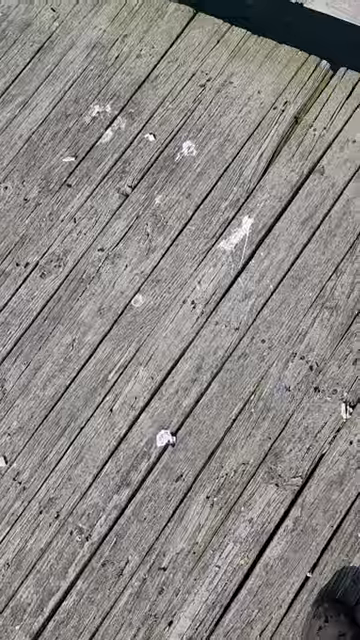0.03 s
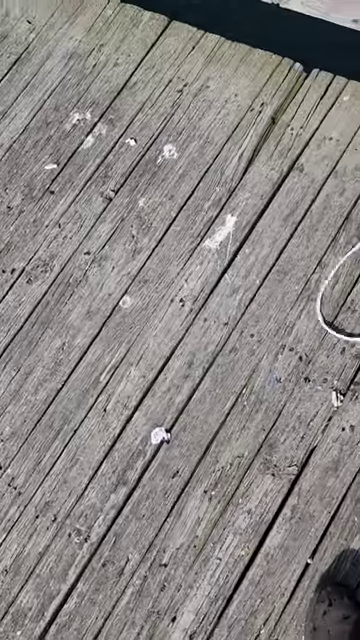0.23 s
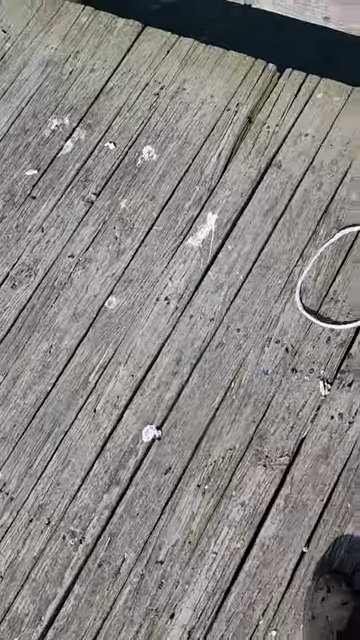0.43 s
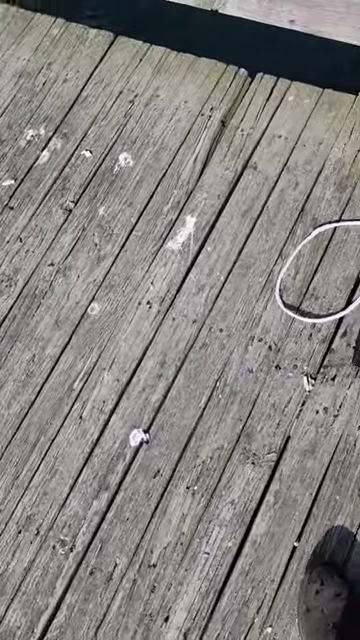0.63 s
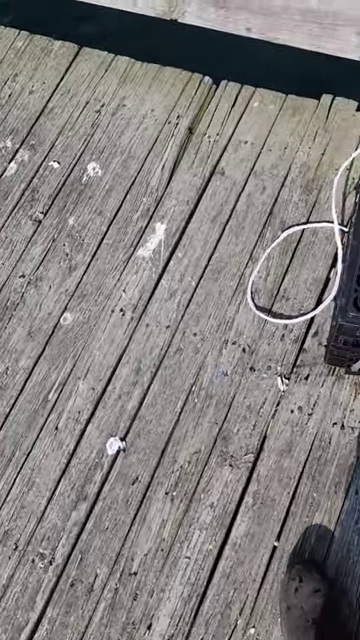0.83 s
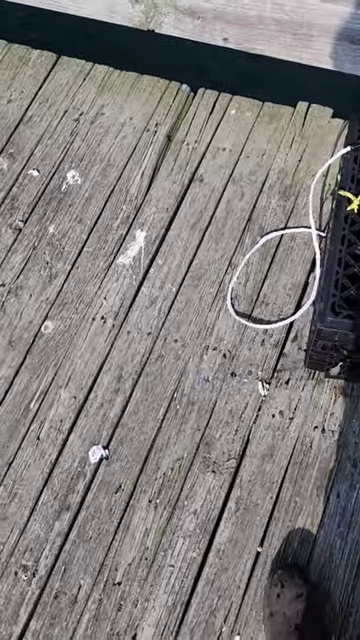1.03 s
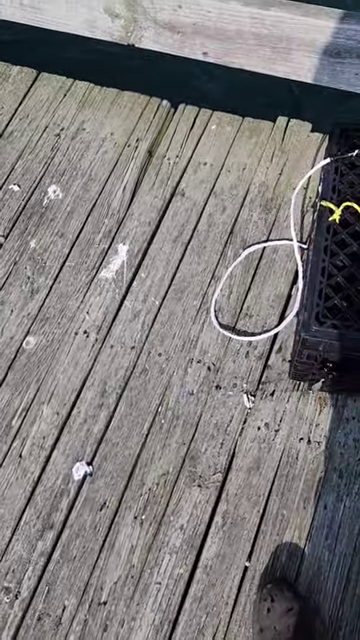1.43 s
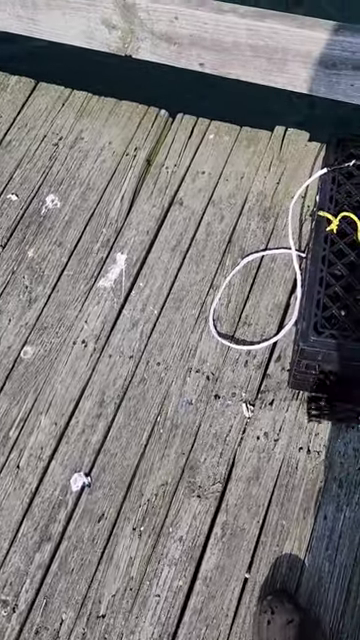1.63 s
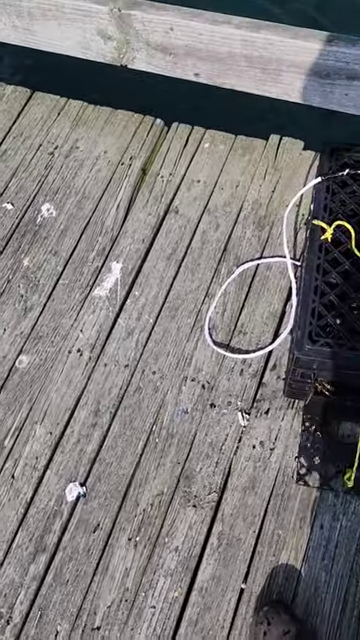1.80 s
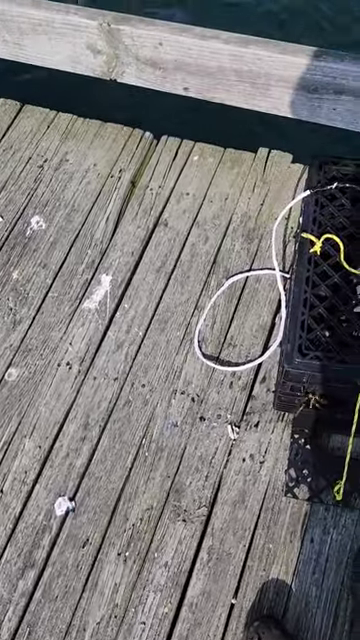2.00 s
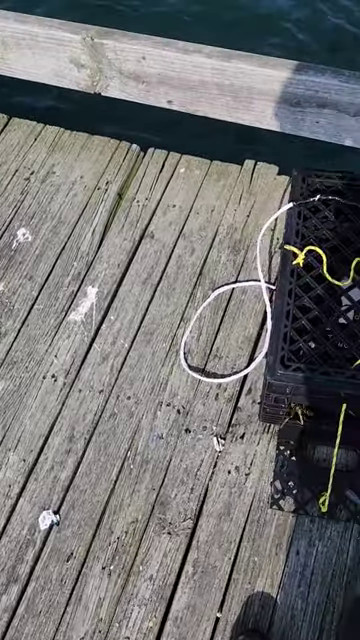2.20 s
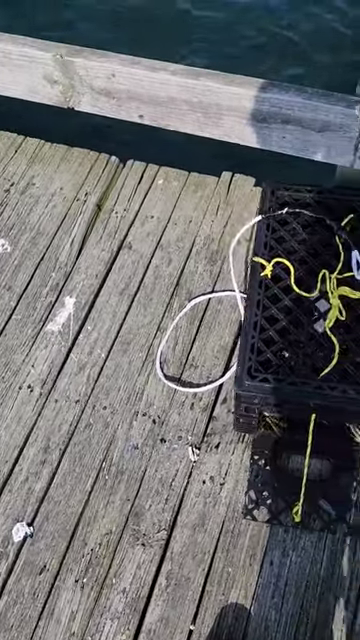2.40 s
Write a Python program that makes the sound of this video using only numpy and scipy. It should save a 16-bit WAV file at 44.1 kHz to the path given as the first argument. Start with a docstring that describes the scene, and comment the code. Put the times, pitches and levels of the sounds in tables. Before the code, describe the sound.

Sharp handling clatter on the microphone, then soft footsteps on planks over low wind.

```python
"""Low wind rumble and a faint wash of water lie under a wooden dock, where someone shifts a hand-held
camera. Fingers rub its case; it clatters sharply, then ticks, each impact ringing its damped modes.
Handling and grit underfoot make faint clicks, and shoes scuff, bump and tap on the planks.
Late on, one hard tap is followed by a gritty slide; fainter scuffs and rubbing close the scene."""
import sys
import numpy as np
from scipy.fft import rfft, irfft, next_fast_len
from scipy.io import wavfile
from scipy.ndimage import map_coordinates

SR = 44100
rng = np.random.default_rng(int(sys.argv[2]) if len(sys.argv) > 2 else 0)


def bounce(signal):
    """Save signal as a 16-bit WAV file at the path given by the first command-line argument."""
    frames = np.transpose(np.atleast_2d(signal))
    limited = np.clip(frames, -1, 1)
    pcm = np.round(limited * 32767).astype(np.int16)
    wavfile.write(sys.argv[1], SR, pcm)


N = 112454
T = np.arange(N) / SR
HIT_T = T[:SR // 3]  # time axis of one short event

# Spectra of the noises: frequency_hz, level_db
WIND_SPECTRUM = [(20, -9), (36, -5.5), (56, 0), (86, 1), (96, 2), (108, -3.5), (165, -13), (215, -13),
                 (270, -19.5), (450, -28.5), (900, -63)]
WATER_SPECTRUM = [(200, -14.5), (500, 1.5), (1000, -6.5), (2000, -14.5), (4500, -20.5), (7500, -21),
                  (9500, -34), (15500, -41)]
RUB_SPECTRUM = [(200, -2.5), (700, -4), (1550, -5), (4000, -18.5), (7500, -16), (9500, -26), (14000, -25)]
CRACK_SPECTRUM = [(150, -2), (600, -7), (1100, 6), (2100, 4), (3300, 0.5), (5000, 0), (9000, -13),
                  (16000, -27)]
TICK_SPECTRUM = [(1000, -43), (3500, -18), (6000, -6), (7000, 4.5), (8300, -7.5), (10000, -12), (11700, 2),
                 (13000, -1.5), (14500, 3.5), (16000, -4.5)]
CLICK_SPECTRUM = [(500, -1), (3000, -1), (4100, 7), (5200, 0), (7200, 3), (9500, -7), (12000, -3.5),
                  (15500, -14)]
SCUFF_SPECTRUM = [(150, 29.5), (500, 11.5), (750, 11), (1300, 11.5), (2200, 7), (3500, -0.5), (7300, -9),
                  (9500, -18.5), (12000, -18.5), (15500, -25)]
# Likeness of left and right, for case impacts and for all other noise: frequency_hz, correlation
CASE_COHERENCE = [(500, .85), (2000, .55), (14000, .65)]
AIR_COHERENCE = [(40, 0.92), (300, 0.91), (1500, 0.11), (8000, 0.089)]
# Slow envelopes of wind and finger friction: time_s, level_db
WIND_LEVELS = [(.1, -39.5), (.55, -43), (.9, -42), (1.2, -37.5), (1.45, -41), (2.15, -43), (2.35, -44),
               (2.55, -46.5)]
RUB_LEVELS = [(.1, -59.5), (.26, -40.5), (.48, -50), (.55, -66), (.8, -63), (1.12, -74), (1.24, -46),
              (1.3, -62.5), (1.48, -49), (1.55, -53.5), (1.69, -55.5), (1.78, -44.5), (1.9, -59),
              (1.97, -60), (2.3, -58.5), (2.45, -72), (2.55, -56)]
# Modes of the case, its small hard parts and the planks: pitch_hz, level_db, t60_s
CASE_MODES = [(221, -20, 0.1), (318, -14, 0.18), (473.7, -19, 0.18), (521, -13, 0.06), (744, -14, 0.14),
              (861.3, 1.5, 0.067), (922, 5, 0.032), (1081, -16, 0.1105), (1369, -15, 0.0896),
              (1459, -15, 0.06), (1650, -16.5, 0.064), (2077, -5, 0.08), (2560, -20.5, 0.06),
              (3164, -12.5, 0.058)]
PART_MODES = [(6490, 5, 0.055), (6890, 2.5, 0.03), (7080, 0.5, 0.022), (11460, -5, 0.032),
              (13800, -5, .025), (14500, 1, .035)]
PLANK_MODES = [(376.5, -18, 0.33), (546, -10.5, 0.057), (1240, -3.5, 0.017), (1550, -3, 0.017)]
# Impacts on the case: start_s, body_db, crack_db, tick_db, decay_s, tick_tilt_db_per_octave
CASE_IMPACTS = [(0.1473, -56.5, -62, -35.5, 0.011, -5.5), (.1825, -33.5, -53, -53.5, 0.015, -5.5),
                (0.204, -31.5, -29, -32, 0.027, 0), (0.2137, -7.5, -13, -20.5, 0.0091, -8),
                (0.2223, -41.5, -26, -41, 0.013, -1), (.2295, -16.5, -18.5, -13.5, 0.0058, 0),
                (.2338, -17, -20.5, -15.5, 0.0025, 0.5), (.239, -23.5, -27.5, -26, 0.0093, -0.5),
                (.272, -42, -42.5, -60, 0.055, -4), (0.2942, -28, -38, -58, 0.024, 2),
                (0.329, -38.5, -53, -36, .003, 5), (.339, -32, -37.5, -53, .005, -1),
                (0.363, -31.5, -31.5, -43.5, 0.004, -5), (.3825, -39, -51.5, -34, .0038, 0),
                (0.406, -57, -45, -44.5, 0.0025, 2), (0.427, -33, -35.5, -61, 0.007, -4),
                (0.4406, -28.5, -30, -34.5, 0.0081, -3.5), (.451, -36, -29, -28, 0.0029, -0.5),
                (.463, -46, -44, -73, 0.025, 1), (.502, -45, -48.5, -50, .0047, -5)]
# Level of the case's sound, left over right: frequency_hz, pan_db
CASE_PAN = [(300, 3.5), (520, 4.5), (900, 0), (2400, 3), (6000, -1.5), (9000, -5), (14000, -5.5)]
# Phase of the case's sound, left ahead of right: frequency_hz, lead_rad
CASE_LEAD = [(450, 0), (600, -.4), (720, 1), (1020, .6), (1300, 2.5), (1600, -2), (2000, .8), (2700, 1),
             (3300, -1.9), (6800, -1), (12000, -2.1)]
# Faint clicks and ticks from grit underfoot and from handling the camera: start_s, level_db, pan_db
SMALL_CLICKS = [(.571, -57, 0), (1.2915, -54.5, 3), (1.307, -57.5, 2), (1.348, -55, 3), (1.4276, -56.5, 3),
                (1.514, -51, 5), (1.7294, -40, 1.5), (1.7968, -35.5, 4.5), (1.8584, -35.5, 3),
                (1.881, -48, -13), (1.921, -55, 0), (2.033, -55, 0), (2.067, -55, -1), (2.341, -60, 0)]
# Slides of soles and clothing: start_s, length_s, level_db, tilt_db_per_octave, pan_db
SCUFF_STROKES = [(0.768, 0.057, -57, 6.5, 1.5), (1.196, 0.021, -40.5, 2.5, 0), (1.221, 0.028, -46, 8, 2),
                 (1.367, 0.035, -44, 0, 0), (1.496, 0.023, -53.5, 10, 0), (1.727, 0.12, -50, 10, 0),
                 (1.847, 0.053, -37.5, 6.5, 0), (1.89, 0.046, -45, -0.5, 3), (2.184, 0.04, -52.5, 4.5, 0.5),
                 (2.351, 0.16, -52.5, 5.5, -0.5)]
# Shifts of weight: start_s, level_db, pitch_hz, pan_db
SOFT_BUMPS = [(1.131, -38.5, 168, -3), (1.165, -27, 93.6, -10.5), (1.318, -34.5, 99, -1),
              (1.529, -26.5, 72, 6), (1.79, -30, 77, 0), (1.895, -39.5, 131, -5), (2.119, -34, 87.5, 0)]
# Hard blows on the planks: start_s, level_db, pitch_hz
HARD_TAPS = [(1.168, -58, 1670), (1.2007, -50.5, 1955), (1.7765, -44.5, 2080), (1.8446, -28.5, 2036),
             (1.8707, -44, 2590), (1.8847, -46, 2580), (2.1837, -51, 1474)]

GRIT_DB = 2.5  # depth of the fast flicker in friction noise


def amp(db):
    """Decibels to amplitude ratio."""
    return 10 ** (np.asarray(db) / 20)


def unit(x):
    """Scale to rms 1."""
    return x / np.sqrt(np.mean(x ** 2) + 1e-20)


def strike(x):
    """Scale a transient to the energy of 5 ms at rms 1."""
    return x / np.sqrt(np.sum(np.atleast_2d(x) ** 2, axis=1).mean() / (.005 * SR))


def rise(tau_s):
    """Exponential approach from 0 to 1."""
    return 1 - np.exp(-HIT_T / tau_s)


def along(points, hz):
    """Interpolate a table on a logarithmic frequency axis."""
    knots_hz, values = np.transpose(points)
    return np.interp(np.log(hz + 1), np.log(knots_hz + 1), values)


def filtered(x, response):
    """Linear filtering: multiply the spectrum by a frequency response."""
    size = x.shape[-1]
    padded = next_fast_len(size + SR // 8)
    return irfft(rfft(x, padded) * response(np.fft.rfftfreq(padded, 1 / SR)), padded)[..., :size]


def wobble(rate_hz):
    """Random modulation: straight lines between Gaussian values."""
    return map_coordinates(rng.standard_normal(int(N * rate_hz / SR) + 4), [T * rate_hz], order=1)


def noise(spectrum, coherence=AIR_COHERENCE, size=len(HIT_T), tilt_db=0):
    """Partly coherent stereo noise of rms 1, tilted per octave about 2 kHz."""
    def response(hz):
        angle = np.arccos(np.clip(along(coherence, hz), -1, 1)) / 2
        gain = amp(along(spectrum, hz) + tilt_db * np.log2(hz / 2000 + .1))
        return gain * [np.cos(angle), np.sin(angle)]
    mid, side = filtered(rng.standard_normal((2, size)), response)
    return unit(np.array([mid + side, mid - side]))


def ring(modes, detune=.005):
    """Free vibration: damped sines whose level and pitch vary a little at every blow."""
    out = np.zeros(len(HIT_T))
    for k, (hz, db, t60) in enumerate(modes):
        envelope = amp(db + rng.normal() - 60 * HIT_T / t60)
        pitch_hz = hz * (1 + detune * rng.normal())
        out += (-1) ** k * envelope * np.sin(2 * np.pi * pitch_hz * HIT_T)
    return out


def add(out, start_s, x, pan_db=0):
    """Superpose an event; positive pan_db favours the left."""
    part = out[:, max(round(start_s * SR), 0):][:, :x.shape[-1]]
    part += amp([[pan_db / 2], [-pan_db / 2]]) * x[..., :part.shape[1]]


def wind():
    """Uneven wind is low-frequency noise under random amplitude modulation."""
    level_db = np.interp(T, *np.transpose(WIND_LEVELS)) + 1.44 * wobble(11)
    return amp(level_db) * noise(WIND_SPECTRUM, size=N)


def water(level_db=-59.5):
    """Distant water merges into broadband noise of gently wavering amplitude."""
    return amp(level_db + 1.7 * wobble(12)) * noise(WATER_SPECTRUM, size=N)


def rubbing(resonance_hz=890, width_hz=110):
    """Forced vibration: uneven finger friction drives the case's main resonance."""
    def resonator(hz):
        damping = 1j * hz * width_hz
        return damping / (resonance_hz ** 2 - hz ** 2 + damping)
    level_db = np.interp(T, *np.transpose(RUB_LEVELS)) + 2 * wobble(35) + GRIT_DB * wobble(600)
    friction = noise(RUB_SPECTRUM, size=N)
    hollow = unit(filtered(friction, resonator))
    return amp(level_db) * unit(friction + hollow)


def chatter(x, rebound=.66, mean_gap_s=.0025):
    """Four rebounds add delayed copies whose interference roughens a ring."""
    gaps, sizes = rng.uniform(0, 2, 4), rng.uniform(-1, 1, 4)
    delays = np.round(np.cumsum(gaps) * mean_gap_s * SR).astype(int)
    return x + rebound * sum(size * np.pad(x, (delay, 0))[:len(x)] for delay, size in zip(delays, sizes))


def case_clatter(main_hz=890, soft_db_per_octave=5):
    """Impact excitation: each contact cracks, rings the case and ticks its small hard parts."""
    out = np.zeros((2, N))
    hardest_db = max(row[1] for row in CASE_IMPACTS)
    onset = rise(.0004)
    after_rattle = amp(-27) * np.exp(-HIT_T / .0166)
    for start_s, body_db, crack_db, tick_db, decay_s, tilt_db in CASE_IMPACTS:
        # Gentle contacts excite the modes above the main one less.
        rolloff_db = soft_db_per_octave * min((hardest_db - body_db) / 20, 1)
        modes = [(hz, db - rolloff_db * max(np.log2(hz / main_hz), 0), t60) for hz, db, t60 in CASE_MODES]
        judder = np.exp(-HIT_T / decay_s)
        body = strike(chatter(ring(modes) * rise(.0009)))
        crack = strike(onset * (judder + after_rattle) * noise(CRACK_SPECTRUM, CASE_COHERENCE))
        tick = strike(onset * judder * noise(TICK_SPECTRUM, CASE_COHERENCE, tilt_db=tilt_db))
        parts = amp(-7.5) * strike(ring(PART_MODES))
        add(out, start_s, amp(body_db) * body + amp(crack_db) * crack + amp(tick_db) * (tick + parts))
    # The two microphone ports hear the case at different levels and out of step.
    sides = np.array([[.5], [-.5]])
    return filtered(out, lambda hz: amp(sides * along(CASE_PAN, hz))
                    * np.exp(1j * sides * along(CASE_LEAD, hz)))


def clicks(decay_s=.003):
    """Handling and grit underfoot make faint clicks: a brief transient has a broad spectrum."""
    out = np.zeros((2, N))
    for start_s, db, pan_db in SMALL_CLICKS:
        click = strike(np.exp(-HIT_T / decay_s) * noise(CLICK_SPECTRUM))
        add(out, start_s, amp(db) * click, pan_db)
    return out


def scuffs(rise_share=.15, fall_share=.2):
    """Sliding friction of soles and clothing makes strokes of noise, roughened by grit."""
    out = np.zeros((2, N))
    for start_s, length_s, db, tilt_db, pan_db in SCUFF_STROKES:
        release = np.maximum(HIT_T / length_s - 1 + fall_share, 0)
        stroke = rise(rise_share * length_s) * np.exp(-release / fall_share)
        roughness = unit(amp(GRIT_DB * wobble(670)))[:len(HIT_T)]
        friction = noise(SCUFF_SPECTRUM, tilt_db=tilt_db)
        add(out, start_s, amp(db) * stroke * roughness * friction, pan_db)
    return out


def bumps(rise_s=.0071, t60_s=.055):
    """Shifting weight loads the planks softly, exciting one low, heavily damped oscillation."""
    out = np.zeros((2, N))
    swell = rise(rise_s) ** 2 * amp(-60 * HIT_T / t60_s)
    swell /= swell.max()
    for start_s, db, hz, pan_db in SOFT_BUMPS:
        add(out, start_s, amp(db) * swell * np.sin(2 * np.pi * hz * HIT_T), pan_db)
    return out


def taps(rise_s=.00077, t60_s=.012, crack_decay_s=.0078):
    """A hard impact knocks and cracks at the point of contact, then the planks vibrate freely."""
    out = np.zeros((2, N))
    envelope = rise(rise_s) ** 2 * amp(-60 * HIT_T / t60_s)
    for start_s, db, hz in HARD_TAPS:
        knock = strike(envelope * np.sin(2 * np.pi * hz * HIT_T))
        crack = strike(np.exp(-HIT_T / crack_decay_s) * noise(CRACK_SPECTRUM, tilt_db=-1.5))
        plank = strike(ring(PLANK_MODES))
        add(out, start_s, amp(db) * (knock + amp(-5.5) * crack + amp(-6) * plank))
    return out


def scene():
    """Superposition of all sources, without reverberation."""
    return case_clatter() + rubbing() + scuffs() + clicks() + bumps() + taps() + wind() + water()


def record(dry, open_s=.091, fade_s=.0057, cutoff_hz=15800):
    """The camera's input opens after a moment; saturation rounds peaks and a low-pass limits the band."""
    gated = dry * np.clip((T - open_s) / fade_s + 1, 0, 1)
    rounded = gated / (1 + np.abs(gated) ** 6) ** (1 / 6)
    return filtered(rounded, lambda hz: 1 / np.sqrt(1 + (hz / cutoff_hz) ** 200))


dry = scene()
out = record(dry)
bounce(out)
```